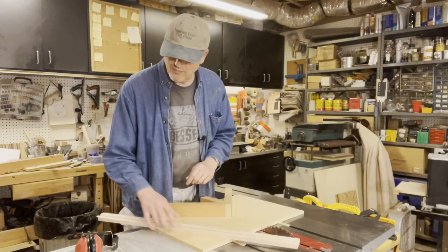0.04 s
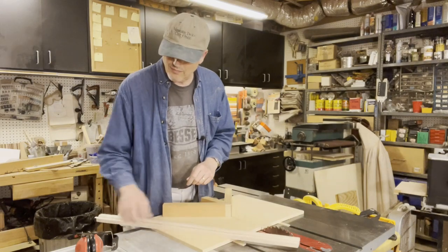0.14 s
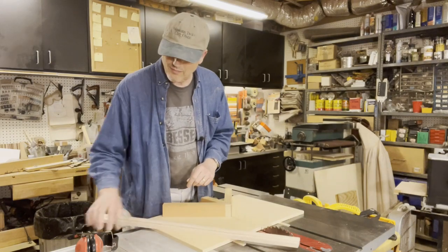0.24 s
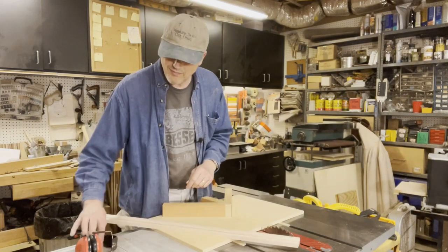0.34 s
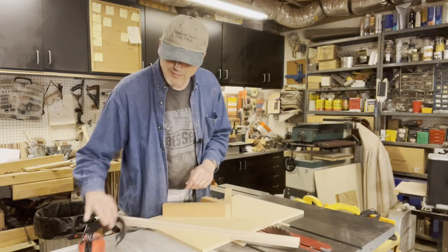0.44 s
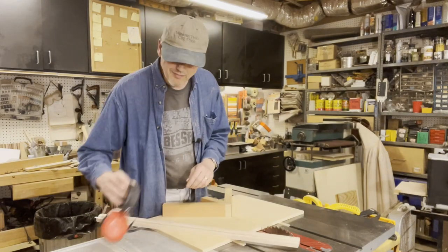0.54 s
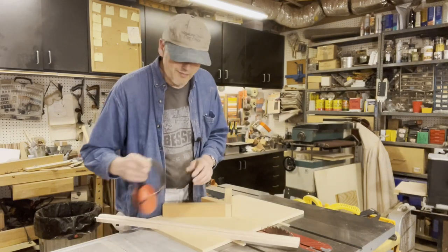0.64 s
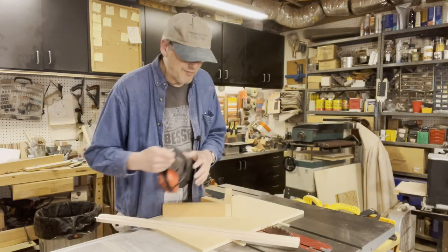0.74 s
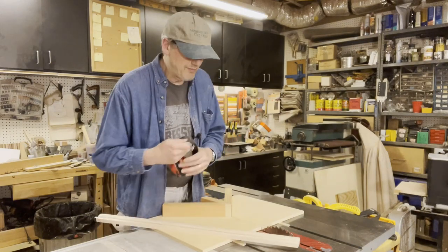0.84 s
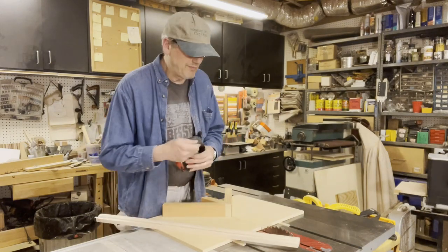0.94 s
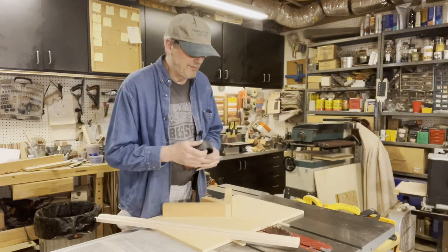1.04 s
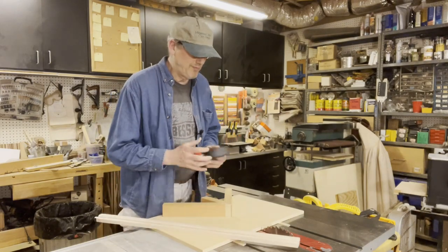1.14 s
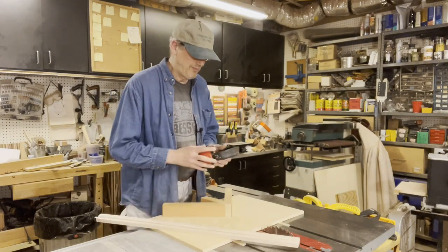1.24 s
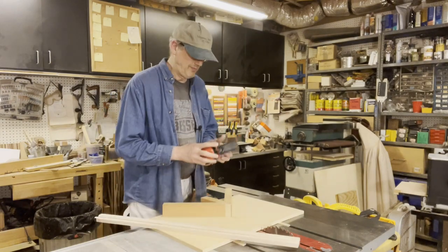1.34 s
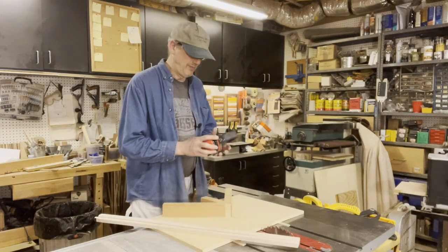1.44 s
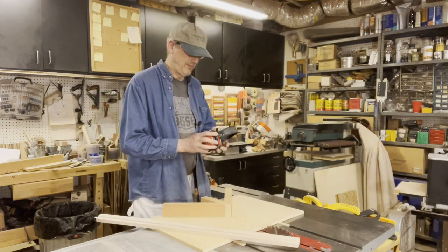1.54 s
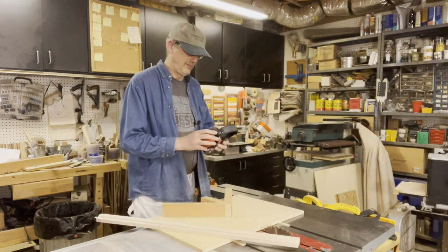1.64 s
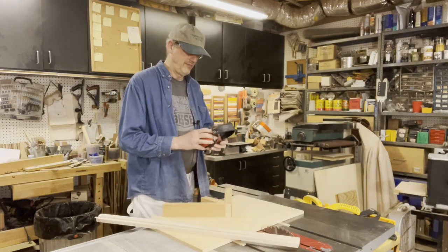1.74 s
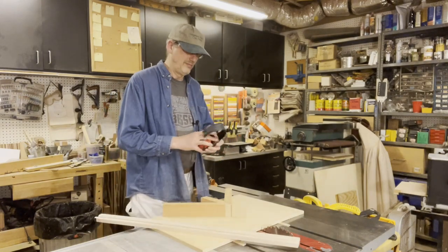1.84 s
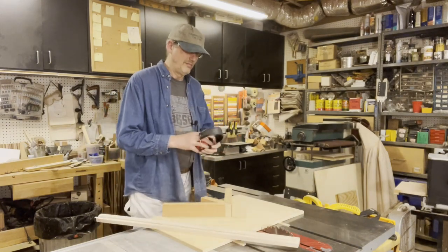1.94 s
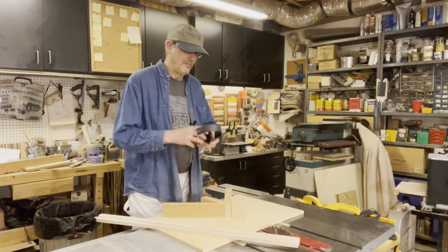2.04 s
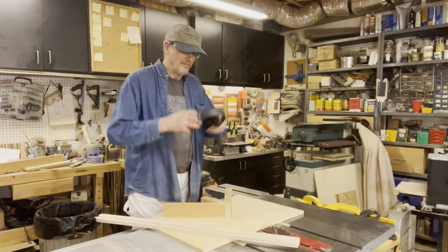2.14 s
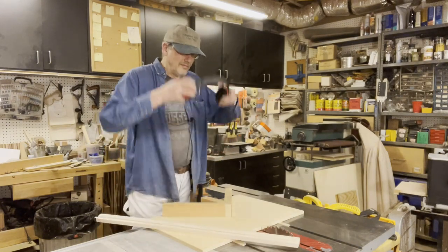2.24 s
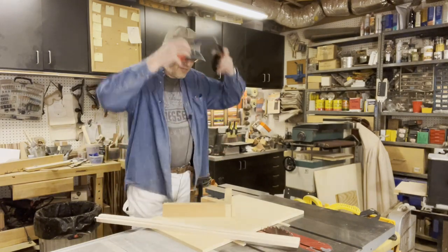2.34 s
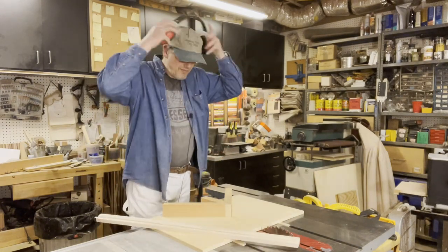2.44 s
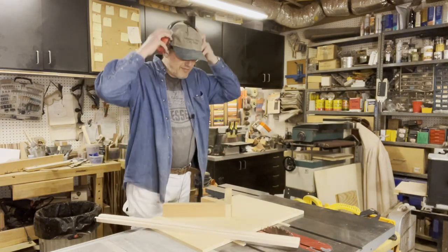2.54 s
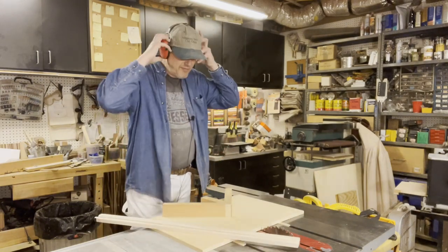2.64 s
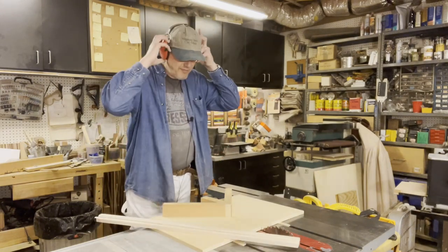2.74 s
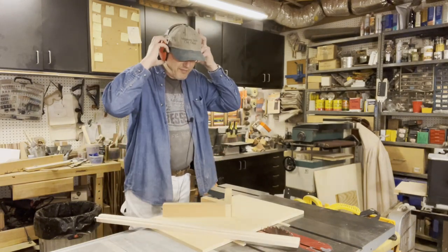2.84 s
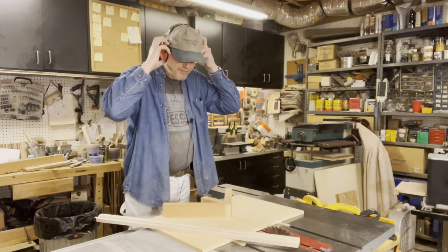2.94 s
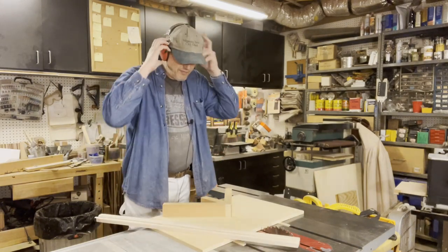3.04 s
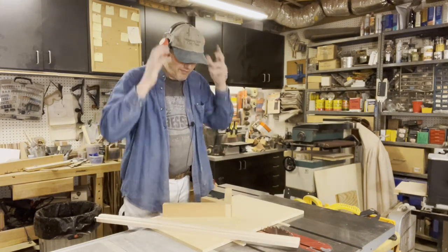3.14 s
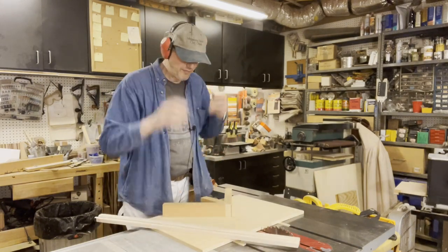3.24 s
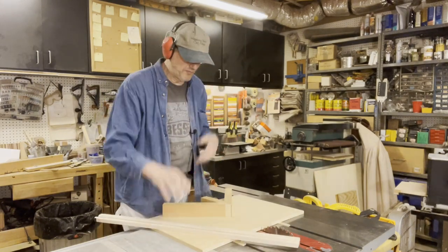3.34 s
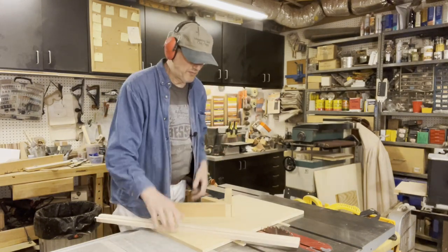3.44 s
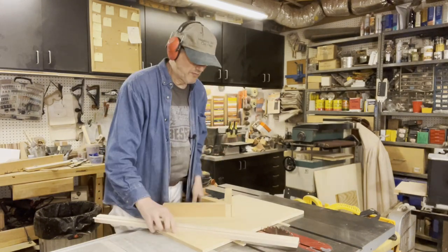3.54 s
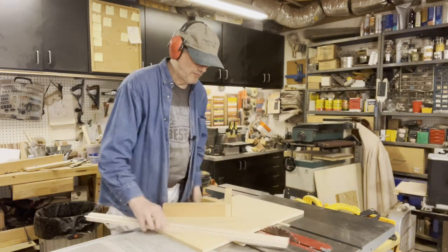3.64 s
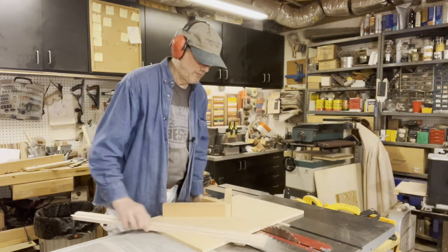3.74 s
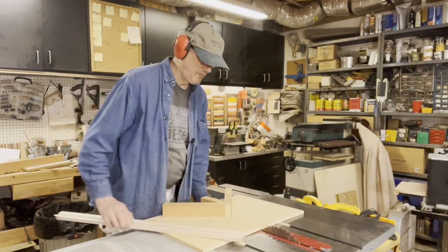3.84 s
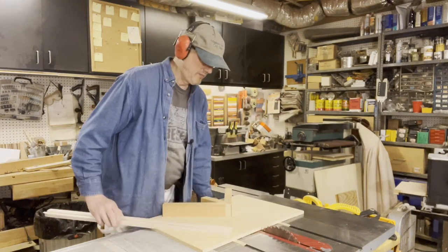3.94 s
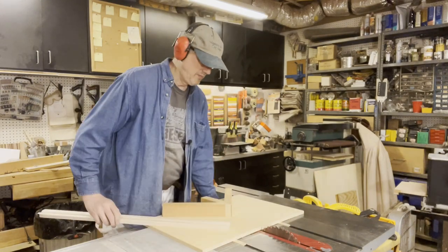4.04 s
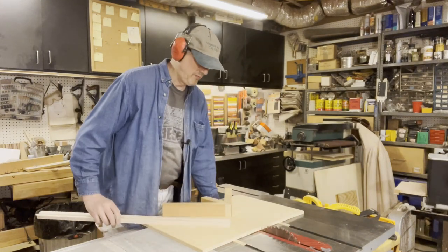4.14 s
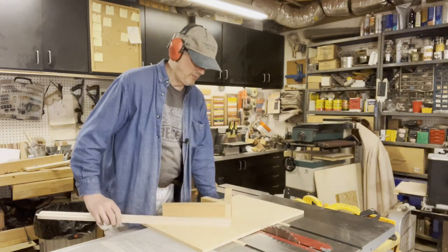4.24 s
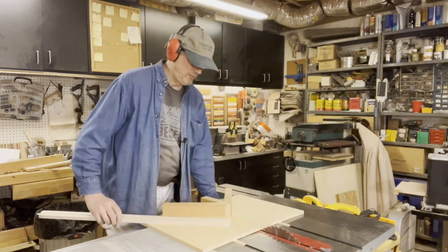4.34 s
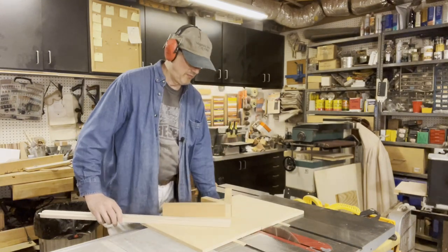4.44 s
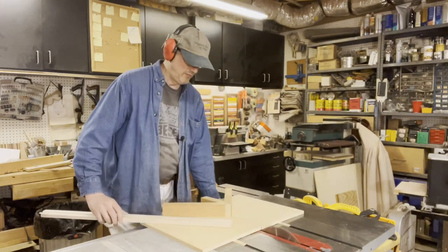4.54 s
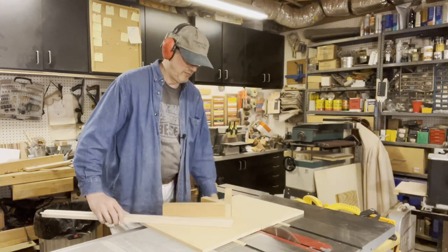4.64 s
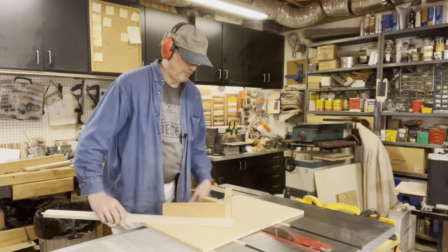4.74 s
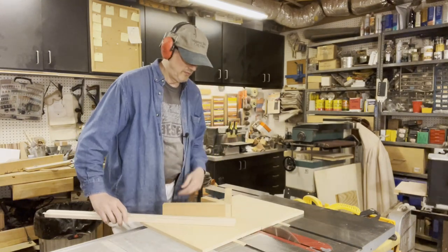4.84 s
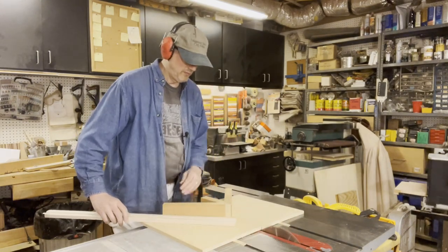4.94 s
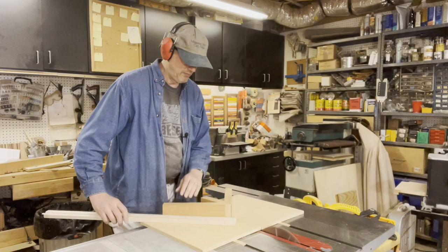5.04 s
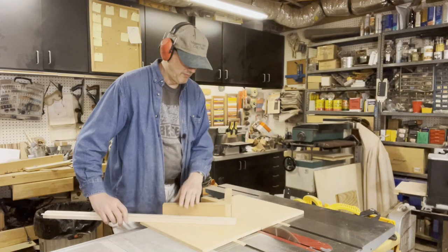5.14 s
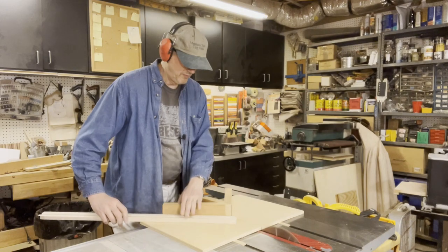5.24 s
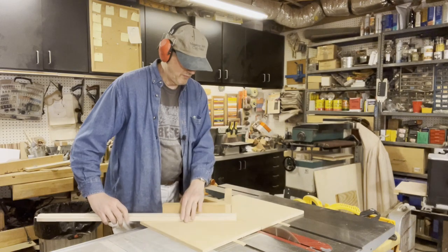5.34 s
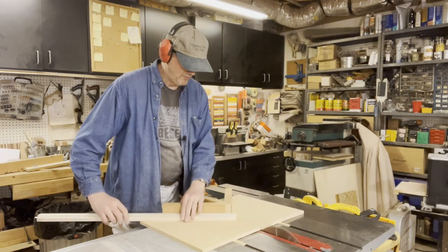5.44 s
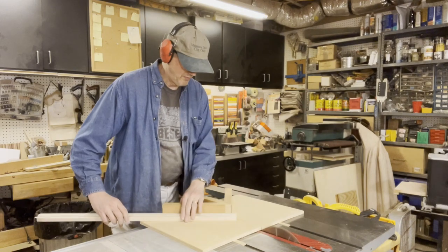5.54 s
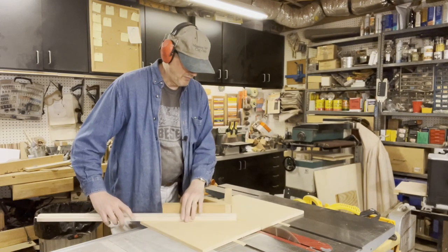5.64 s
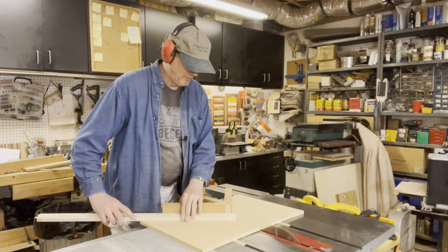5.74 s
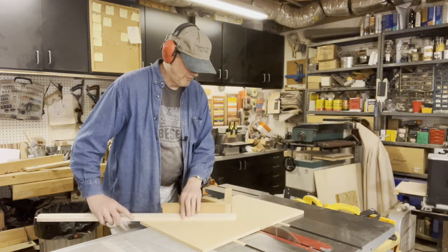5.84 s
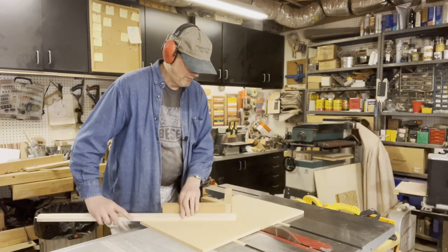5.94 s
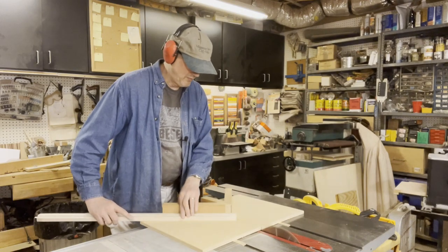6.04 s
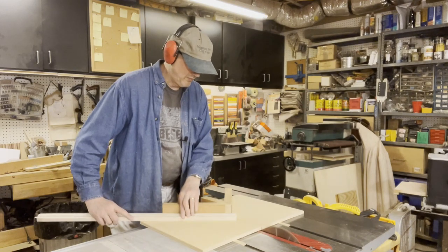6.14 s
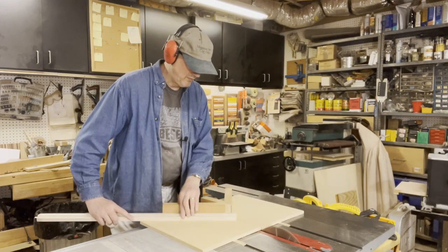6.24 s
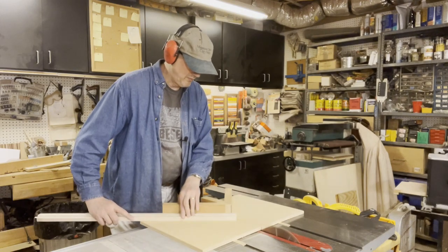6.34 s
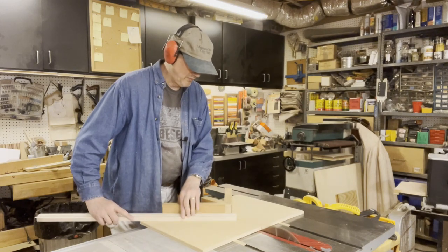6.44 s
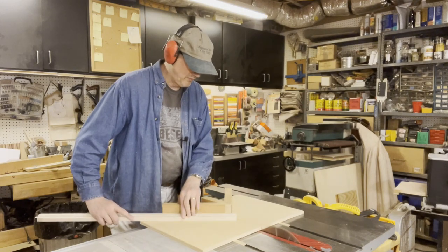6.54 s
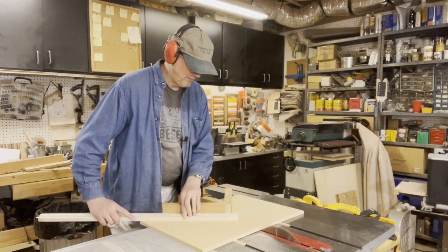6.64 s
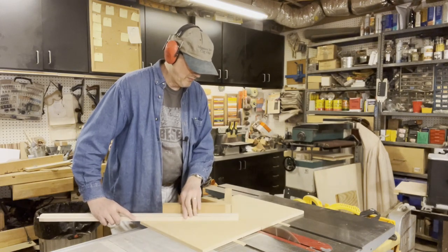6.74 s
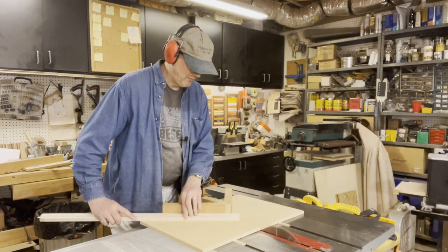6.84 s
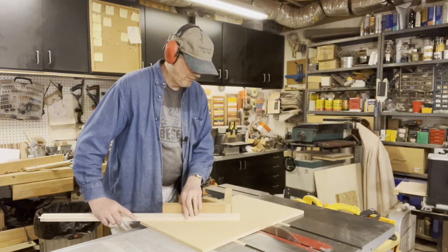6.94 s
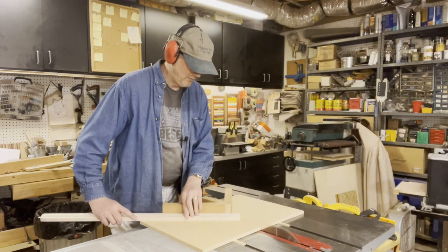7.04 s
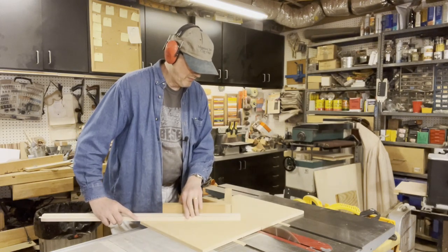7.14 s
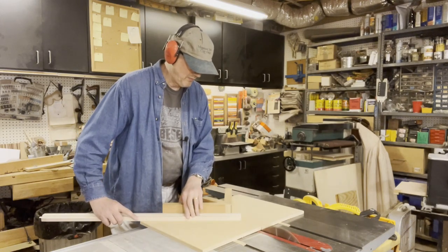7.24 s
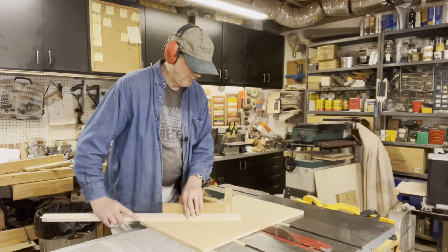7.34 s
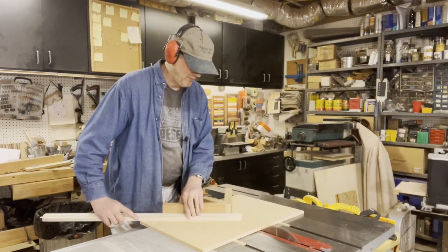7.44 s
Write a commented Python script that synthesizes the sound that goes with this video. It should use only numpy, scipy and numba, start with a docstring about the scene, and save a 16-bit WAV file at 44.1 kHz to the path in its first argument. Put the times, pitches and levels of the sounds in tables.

```python
"""A table saw starts up in a small crowded workshop: the motor jolts and hums, the blade runs up to a breathy
whistle. Hum is steady sines; roar, whistle and air are shaped noise, the whistle's pitch following the blade.
Before it, a wooden strip knocks and slides on a plywood sled (ringing modes, grainy rubbing), plastic ear
defenders click, sleeves rustle and panels thud. All is heard by a microphone pair, with a low house rumble
until the saw's roar covers it."""
import sys
import numpy as np
from scipy import signal
from scipy.fft import rfft, irfft
from scipy.io import wavfile
from scipy.ndimage import uniform_filter1d
from numba import njit

SR = 44100
rng = np.random.default_rng(int(sys.argv[2]) if len(sys.argv) > 2 else 0)


def to_wav(s):
    """Save 16-bit WAV."""
    ch = np.atleast_2d(s).T  # columns
    pcm = np.round(np.clip(ch, -1, 1) * 32767)  # PCM
    wavfile.write(sys.argv[1], SR, pcm.astype(np.int16))


N = 329427
T = np.arange(N) / SR
HUM_HZ = 120  # twice the mains frequency
JOLT_END_S = 4.681

# saw running up, surging as the starting switch lets go, then settling:
# [t/s, hum level/dB, cabinet roar level/dB, blade whistle level/dB]
SAW = [(4.681, -51, -38, -60), (4.711, -57, -32.5, -43), (4.779, -52, -39.5, -47), (4.839, -42, -42, -51),
       (4.957, -41, -42, -51.5), (5.069, -31.5, -34.5, -39.5), (5.165, -33.5, -33.5, -37.5),
       (5.22, -42, -43, -37.5), (5.4, -44, -38, -35.5), (5.72, -43, -42, -40)]
# blade running up: [t/s, share of full speed]
SPEED = [(4.68, .2), (4.9, .5), (5.05, .74), (5.12, .86), (5.18, .94), (5.26, 1.0)]
# stereo width of the saw: [f/Hz, side minus mid level/dB]
SAW_SIDE = [(60, -26.5), (110, -17), (200, -15), (380, -9.5), (700, -2), (1290, -5), (2380, -8),
            (4400, -3.5), (8120, -4.5), (15000, 3)]
# resonances of the rubbed ear-defender cups: [f/Hz, width/Hz, level/dB]
HOLLOW = [(860, 130, -0.5), (1790, 150, -12), (2220, 99, 0), (3770, 230, -28), (4300, 470, -15)]
# resonances of the rubbed strip: [f/Hz, width/Hz, level/dB]
STRIP = [(402, 57, 1.5), (669, 19.5, 4), (1246, 69, 5), (1640, 43, -2), (2280, 28, -22.5), (2726, 160, -4),
         (3500, 16, -10), (4000, 180, -17), (4720, 94, -6), (5900, 78, -25)]


def undb(db):
    """Decibels to an amplitude factor."""
    return 10 ** (np.asarray(db) / 20)


def unit(x):
    """The sound at rms 1."""
    return x / np.sqrt(np.mean(x ** 2))


def curves(table):
    """Columns of a table as sample-rate lines: -120 before the first time, the last value held after."""
    s, *columns = np.transpose(table)
    return [np.interp(T, s, c, left=-120, right=c[-1]) for c in columns]


def on_log(table, hz):
    """A table's values read off along a logarithmic frequency axis."""
    f, v = np.transpose(table)
    return np.interp(np.log(hz + 1), np.log(f + 1), v)


@njit
def svf(x, hz, width):
    """State-variable band-pass whose centre and width may move, gain 1 at the centre."""
    y, b, l = np.empty(len(x)), 0., 0.
    for i in range(len(x)):
        g, k = np.tan(np.pi * hz[i] / SR), width[i] / hz[i]
        v = (b + g * (x[i] - l)) / (1 + g * (g + k))
        b, l, y[i] = 2 * v - b, l + 2 * g * v, k * v
    return y


def walk(rate):
    """Random levels held 1 / rate s and slewed twice; spread near 1."""
    k = int(SR / rate)
    steps = np.repeat(rng.standard_normal(N // k + 1), k)
    return 1.8 * uniform_filter1d(uniform_filter1d(steps, k), k)[:N]


def grit(shape, spread_db):
    """Dense noise grains of randomly uneven size."""
    size_db = spread_db * np.minimum(rng.exponential(size=shape), 4)
    return rng.standard_normal(shape) * undb(size_db)


def spread(mid, side, table):
    """Left and right from a mid sound and an unrelated side sound weighted by frequency."""
    side_gain = undb(on_log(table, np.fft.rfftfreq(N, 1 / SR)))
    side = irfft(rfft(side) * side_gain, N)
    return np.array([mid + side, mid - side])


def noise(colour, side_table, grit_db=0.):
    """Stereo coloured noise, mid rms 1; grit makes it a rain of uneven grains."""
    gain = undb(on_log(colour, np.fft.rfftfreq(N, 1 / SR)))
    mid, side = (unit(irfft(rfft(grit(N, grit_db)) * gain, N)) for _ in range(2))
    return spread(mid, side, side_table)


def band(x, lo_hz, hi_hz, order):
    """A band-passed sound at peak 1."""
    y = signal.sosfilt(signal.butter(order, [lo_hz, hi_hz], "band", fs=SR, output="sos"), x)
    return y / np.abs(y).max()


def place(out, s, sound, pan_db):
    """Adds a sound to the microphone pair, left 3 samples later; pan_db is left minus right."""
    for channel, lag, db in ((0, 3, pan_db / 2), (1, 0, -pan_db / 2)):
        i = int(s * SR) + lag
        out[channel, i:i + len(sound)] += undb(db) * sound


def resonate(x, table, wander_db):
    """A body's resonances excited by rubbing; each swells and fades as the contact point moves."""
    out, still = 0, np.ones(len(x))
    for hz, width, db in table:
        level = undb(db + wander_db * walk(30)[:len(x)])
        out = out + level * svf(x, hz * still, width * still)
    return unit(out)


def rings(table, scale, blur):
    """Unrelated noise through each resonance, twice for steep skirts, evened out for bandwidth."""
    out = 0
    for hz, width, db in table:
        once = svf(rng.standard_normal(N), hz * scale, width * blur)
        twice = svf(once, hz * scale, width * blur)
        out = out + undb(db) * twice / np.sqrt(np.pi * width * blur / SR)
    return out


def blows(events, modes, octaves, rise, t60, pan_db, crack_s, crack_db):
    """Each blow rings the modes near its centre afresh, with a short rattling contact and a bright crack."""
    out, t = np.zeros((2, N)), np.arange(SR // 4) / SR
    hz, mode_db, mode_t60 = (c[:, None] for c in np.transpose(modes))
    # the blow's own damping shortens every mode
    decay = np.log(1000) * (1 / np.clip(mode_t60, .02, 1) + 1 / t60)
    onset = np.clip(t / rise, 0, 1)
    for s, peak_db, centre_hz, top_db in events:
        detune, size = rng.standard_normal((2, len(modes), 1))
        tones = np.sin(2 * np.pi * hz * (1 + 0.055 * detune) * t)
        ring = np.sum(undb(mode_db + 2 * size) * tones * np.exp(-decay * t), axis=0)
        contact = rng.standard_normal(len(t)) * np.exp(-t / crack_s)
        struck = onset * (ring / np.abs(ring).max() + undb(crack_db) * contact)
        body = band(struck, centre_hz / 2.8, centre_hz * 2 ** octaves, order=3)
        crack = band(onset * contact, 3300, 7000, order=3)
        place(out, s, undb(peak_db) * (body + undb(top_db) * crack), pan_db)
    return out


def strokes(table, body, ring_db):
    """Each stroke swells fast and fades; fibres catch as dense grains and ring the rubbed body."""
    out = np.zeros((2, N))
    for start, length, db, centre_hz, hiss_db in table:
        u = np.linspace(0, 1.6, int(1.3 * length * SR))
        shape = np.clip(u / 0.29, 0, 1) ** 2 * np.exp(-(u / 0.96) ** 4)
        grains = grit((3, len(u)), 3.1)
        # one part in the middle, one mostly in each capsule
        for k, pan_db in enumerate((0, -40, 40)):
            rub = unit(band(grains[k], centre_hz / 2.26, centre_hz * 2, order=1))
            hiss = unit(band(grains[k], 5900, 9200, order=2))
            ring = sum(undb(d) * signal.lfilter(*signal.iirpeak(hz, hz / w, SR), grains[k]) for hz, w, d in body)
            stroke = rub + undb(hiss_db) * hiss + undb(ring_db) * unit(ring)
            place(out, start, undb(db - 0.5 * abs(pan_db)) * shape * stroke, pan_db)
    return out


def room(dry):
    """Dense echoes off shelves and benches; the treble dies first, the bass is more alike left and right."""
    # octave bands of the echo: [f/Hz, t60/s, level/dB]
    octave_bands = [(293.7, 0.2, 4), (620, 0.16, 0.5), (1192, 0.16, 0), (2380, 0.17, 0.5), (4700, 0.18, 0),
                    (9600, 0.067, -6.5)]
    t = np.arange(SR // 2) / SR
    tail = 0
    for hz, t60, db in octave_bands:
        sos = signal.butter(2, [hz / np.sqrt(2), hz * np.sqrt(2)], "band", fs=SR, output="sos")
        shared = 1.62 * min(300 / hz, 2) * rng.standard_normal(len(t))
        echo = rng.standard_normal((2, len(t))) + shared
        tail = tail + undb(db) * signal.sosfilt(sos, echo) * np.exp(-np.log(1000) * t / t60)
    tail = tail * np.clip(t / 0.007, 0, 1)
    tail = tail / np.sqrt(np.sum(tail ** 2) / 2)
    return dry + undb(-5) * signal.fftconvolve(dry.mean(axis=0)[None], tail, axes=1)[:, :N]


def rumble():
    """House rumble: low noise of wavering level, left out once the saw's roar covers it."""
    # rumble level: [t/s, level/dB]
    rumble_level = [(0.0, -60), (0.38, -57), (0.63, -66), (1.02, -66.5), (2.2, -70), (2.85, -65.5),
                    (3.25, -71.5), (3.57, -63), (3.78, -66.5), (3.93, -63.5), (4.33, -61), (4.6, -74),
                    (4.7, -56), (4.75, -92)]
    # rumble spectrum: [f/Hz, level/dB per Hz]
    rumble_colour = [(15, -43.5), (25, -20), (37, -6), (49, 0), (65, 2), (87, -11.5), (124, -2), (162, -21),
                     (250, -14), (320, -36.5), (550, -120)]
    # rumble stereo width: [f/Hz, side minus mid level/dB]
    rumble_side = [(30, -11.5), (80, -10), (250, -7.5)]
    return undb(curves(rumble_level)[0] + 2.8 * walk(8)) * noise(rumble_colour, rumble_side)


def thuds():
    """Soft pushes into heavy panels: a low, quickly damped cluster of three tones."""
    # dull thuds through table top and floor: [t/s, peak level/dB, f/Hz, t60/s]
    pushes = [(0.022, -30.5, 389, .12), (0.046, -38, 133, 0.24), (0.181, -25, 262, 0.083),
              (0.19, -24.5, 140.7, 0.42), (0.252, -26.5, 167, .18), (0.28, -23, 408, 0.14),
              (0.305, -26.5, 123.4, .35), (0.537, -33.5, 157.5, .13), (0.594, -24, 405, 0.057),
              (0.605, -28, 180, .2), (0.652, -28, 414, 0.083), (1.027, -44, 167, 0.052),
              (1.047, -44.5, 106, 0.13), (1.159, -44.5, 113, .3), (1.518, -49, 137.4, 0.11),
              (1.907, -37.5, 214, 0.11), (2.771, -29.5, 175, 0.094), (3.676, -33, 334, 0.086),
              (3.719, -38, 122, .29), (3.999, -34, 375, 0.18), (4.15, -41, 520, .095),
              (4.424, -39.5, 71, 0.29), (4.453, -41.5, 74, 0.18), (4.5, -40.5, 75.7, 0.29),
              (4.549, -39, 72, 0.16), (5.141, -52, 119, .26)]
    out, t = np.zeros((2, N)), np.arange(SR // 2) / SR
    onset = 1 - np.exp(-t / 0.004)
    for s, peak_db, hz, t60 in pushes:
        ratio = np.array([[.75], [1.], [1.45]]) * (1 + .05 * rng.standard_normal((3, 1)))
        weight = np.array([[.5], [1.], [.6]])
        tones = np.sum(weight * np.sin(2 * np.pi * hz * ratio * t), axis=0)
        tones = tones * onset * np.exp(-np.log(1000) * t / t60)
        place(out, s, undb(peak_db) * band(tones, 0.63 * hz, 3.3 * hz, order=2), -1.1)
    return out


def hands():
    """Sleeves, hands and fingers rub the hollow cups and the stretched headband, each stroke a burst of grains."""
    # single strokes of sleeve or hand: [t/s, length/s, level/dB, centre f/Hz, hiss minus that level/dB]
    sleeve_strokes = [(0.021, 0.049, -50, 1500, -31), (1.013, 0.08, -63.5, 2210, -8.5),
                      (1.146, 0.1, -49.5, 1470, -26.5), (1.21, 0.088, -53, 2810, -23),
                      (1.346, 0.123, -74, 3550, 7), (1.566, 0.064, -67, 2610, -16),
                      (1.907, 0.043, -52, 2505, -5), (1.997, 0.073, -68, 2550, 2.5),
                      (2.7, 0.15, -55.5, 1300, -14), (2.765, 0.082, -53, 1810, -16),
                      (2.93, 0.17, -69, 1995, -7), (4.475, 0.12, -72.5, 548, -37)]
    # fingers rubbing the hollow cups: [t/s, length/s, level/dB, centre f/Hz, hiss minus that level/dB]
    finger_strokes = [(0.581, 0.11, -65.5, 2500, -22), (1.854, 0.042, -72, 1910, -19),
                      (2.159, 0.087, -55.5, 1470, 0.5), (2.245, 0.07, -68.5, 2000, 9)]
    # headband stretched over the cap: [t/s, length/s, level/dB, centre f/Hz, hiss minus that level/dB]
    stretches = [(2.40, 0.066, -75, 3000, 8), (2.465, 0.19, -75.5, 1800, -21), (2.57, 0.22, -72, 2500, -20),
                 (2.6, 0.06, -69.5, 1050, -22)]
    # headband resonances: [f/Hz, width/Hz, level/dB]
    headband = [(1030, 130, 2), (1243, 85, -5), (1970, 78, -7), (3080, 170, -4)]
    sleeves = strokes(sleeve_strokes, HOLLOW, ring_db=-23.0)
    fingers = strokes(finger_strokes, HOLLOW, ring_db=4.5)
    return sleeves + fingers + strokes(stretches, headband, ring_db=2.5)


def ear_defenders():
    """Plastic ear defenders handled and snapped on: short blows ringing the hollow cups."""
    # clicks: [t/s, peak level/dB, centre f/Hz, crack minus peak level/dB]
    clicks = [(1.869, -42, 1820, -20), (1.91, -29.5, 2380, 1), (2.2, -34, 1800, -25),
              (2.247, -34.5, 2330, 7), (2.771, -26.5, 800, -9)]
    # cup modes before the blow's damping: [f/Hz, level/dB, t60/s (held to 0.02-1)]
    cups = [(770, -10.5, 0.48), (1085, -31, 1.2), (1410, -37, 5.0), (1727, -4, 0.13), (2190, -27, 0.41),
            (2177, 2.5, 0.018), (2455, -17, 5.0), (2864, 1.5, 0.32), (3530, -14, 0.32), (3902, -20, 0.13),
            (4080, -4, 0.6), (4780, -18, 5.0), (4970, -18, 0.063), (5370, -37, 0.11)]
    return blows(clicks, cups, octaves=0.87, rise=0.00096, t60=0.032, pan_db=-5, crack_s=0.0021, crack_db=1)


def scuffs():
    """The strip's edge catches as it slides: brief grainy strokes that ring the strip."""
    # catches: [t/s, length/s, level/dB, centre f/Hz, hiss minus that level/dB]
    edge_catches = [(3.69, 0.07, -71, 1800, -21), (3.865, 0.056, -63, 1300, -27),
                    (3.94, 0.05, -54, 2800, -22), (4.17, 0.063, -67, 1600, -17),
                    (4.235, 0.045, -57, 2900, -19)]
    return strokes(edge_catches, STRIP, ring_db=4.5)


def rubbing():
    """Cloth and wood sliding over background hiss: catching grains, a dull drone of the sled and a fine hiss."""
    # rustle and background hiss, nearly silent just after the loud knock: [t/s, level/dB]
    rustle = [(0.0, -65), (0.15, -59.5), (0.21, -69), (0.35, -100), (0.5, -79), (0.57, -48.5),
              (0.63, -62.5), (0.78, -67.5), (0.98, -76), (1.24, -73), (1.57, -75.5), (2.1, -73),
              (2.24, -71), (2.39, -76), (2.67, -72), (2.85, -77.5), (3.0, -78.5), (3.22, -80.5),
              (3.67, -83.5)]
    # sled booms after the drop, then drones as things are dragged off it: [t/s, level/dB]
    drag = [(0.17, -93), (0.2, -39), (0.33, -40), (0.42, -54), (0.5, -71), (0.57, -45.5), (0.69, -37.5),
            (0.75, -58), (0.81, -87)]
    # strip slid into place in three pushes: [t/s, rub level/dB, drone level/dB]
    slide = [(3.67, -66, -73), (3.68, -64, -42), (3.728, -51, -54), (3.808, -56, -49.5), (3.97, -47.5, -82),
             (4.01, -44, -56), (4.062, -50, -60), (4.132, -54, -59), (4.15, -47.5, -54), (4.246, -44, -59),
             (4.294, -49.5, -50.5), (4.402, -68, -74), (4.456, -81, -66), (4.58, -93, -61), (4.6, -62, -72)]
    # spectrum of the fine hiss: [f/Hz, level/dB per Hz]
    rub_hiss = [(1470, -29.5), (2500, -5.5), (2850, -8.5), (3740, -8.5), (5740, -15.5), (8660, -10.5),
                (10900, -20), (12100, -33), (14700, -20.5), (16000, -34.5)]
    # spectrum of the rubbing grains: [f/Hz, level/dB per Hz]
    rub_body = [(290, -37.5), (500, 0.5), (553, -15.5), (659, -8), (943, -6), (1230, -8), (1450, -6),
                (2790, -11.5), (4500, -24.5), (5850, -50), (9900, -120)]
    # stereo width of the rubbing: [f/Hz, side minus mid level/dB]
    near_side = [(60, -4), (110, 6.5), (200, -11), (380, -2.5), (700, 3), (1290, -2.5), (2380, -2.5),
                 (4400, 4.5), (8120, -7), (15000, 4.5)]
    drone_colour = [(90, -28.5), (150, 8.5), (400, 6.5), (700, -10), (1100, -39.5)]  # f/Hz, level/dB per Hz

    rustle_db = curves(rustle)[0]
    slide_db, sled_db = curves(slide)
    sliding = T > slide[0][0]
    rub_db = np.where(sliding, slide_db, rustle_db - 4)
    drone_db = np.where(sliding, sled_db, np.maximum(rustle_db - 3.5, curves(drag)[0]))
    # hiss grows a little faster than the rub
    hiss_db = np.where(sliding, -57.5 + 1.13 * (slide_db + 51), rustle_db)

    strip = resonate(grit(N, 6.8), STRIP, wander_db=4.) * sliding
    grains = noise(rub_body, near_side, grit_db=4.0) + undb(-4.) * strip
    rub = undb(rub_db + 0.83 * walk(40)) * grains
    drone = undb(drone_db + 1.1 * walk(25)) * noise(drone_colour, near_side)
    hiss = undb(hiss_db + 0.78 * walk(27)) * noise(rub_hiss, near_side, grit_db=4.5)
    return (T < slide[-1][0]) * (rub + drone + hiss)


def wood_knocks():
    """Sled and strip knock together: each blow rings damped wooden modes."""
    # blows on sled and strip: [t/s, peak level/dB, centre f/Hz, crack minus peak level/dB]
    knocks = [(0.018, -17.5, 1480, -35), (0.059, -33, 630, 0), (0.182, -8.5, 1250, -29.5),
              (0.252, -26, 925, -18), (0.282, -7.5, 1480, -42), (0.289, -8, 1688, -29.5),
              (0.319, -22, 770, -39), (0.514, -45, 829, -6.5), (0.536, -34.5, 674, 3),
              (0.573, -22.5, 1490, -34), (0.651, -27, 610, -10.5), (3.479, -51.5, 774, -34),
              (3.677, -33.5, 1350, -13), (3.694, -33, 1290, -20), (3.877, -34, 1400, -13),
              (4.01, -32.5, 1300, -11), (4.152, -27, 680, -11), (5.547, -14, 1500, -10)]
    # wood modes before the blow's damping: [f/Hz, level/dB, t60/s (held to 0.02-1)]
    wood = [(544.4, -13.5, 0.12), (696.7, -3, 0.013), (790, -28.5, 0.062), (876, -6.5, 0.026),
            (940, -27, 2.2), (1165, -18, 0.25), (1267, -12, 0.078), (1360, -20.5, 0.14), (1470, -17, 0.24),
            (1553, -22, 0.39), (1797, -9.5, 0.12), (2150, -34.5, 0.087), (2000, -30.5, 0.062),
            (2420, -48.5, 5.0), (2350, -17, 0.36), (2540, -32.5, 0.11), (2430, -22.5, 0.15),
            (2850, -14.5, 0.095), (2920, -40.5, 0.24), (3060, -44.5, 5.0), (3480, -31, 0.25),
            (3320, -29, 0.4), (3919, -39, 0.11), (4791, -58, 0.13)]
    return blows(knocks, wood, octaves=0.75, rise=0.002, t60=0.04, pan_db=-2.5, crack_s=0.0044, crack_db=3.5)


def starting_switch():
    """The motor's starting switch lets go and settles: two blows on a ringing plate."""
    # switch blows: [t/s, peak level/dB, centre f/Hz, crack minus peak level/dB]
    switch_blows = [(5.074, -20.5, 1360, -21), (5.154, -27.5, 1030, -9)]
    # plate modes before the blow's damping: [f/Hz, level/dB, t60/s (held to 0.02-1)]
    plate = [(814, -7, 0.3), (1025, -6.5, 0.3), (1700, -16, 0.13), (2200, -8, 0.025)]
    return blows(switch_blows, plate, octaves=0.46, rise=0.0011, t60=0.11, pan_db=-2, crack_s=0.0038, crack_db=7.5)


def spit():
    """A short, very bright hiss swells and dies as the starting switch opens."""
    # spit spectrum: [f/Hz, level/dB per Hz]
    spit_colour = [(3000, -20), (6000, -6), (9000, 3), (11500, -8), (14000, -6), (16000, -14)]
    peak_s, rise_s, fall_s = 5.071, 0.0068, 0.018
    since = T - peak_s
    swell = np.exp(np.minimum(since / rise_s, -since / fall_s))
    return undb(-35.5) * swell * noise(spit_colour, SAW_SIDE, grit_db=2.5)


def throb():
    """At speed the cabinet throbs, for a while more strongly, over a faint low pair of tones."""
    # steady pair under the hum: [f/Hz, level/dB]
    low_tones = [(53.8, -64), (70.0, -65)]
    throb_hz, peak_s, swell_s, swell_width_s = 8.1, 6.1, 6.27, 0.39
    beat = 1 + np.cos(2 * np.pi * throb_hz * (T - peak_s) + 0.3 * walk(3.1))
    swell_db = 9.5 * np.exp(-((T - swell_s) / swell_width_s) ** 4)
    db = -56 + swell_db + 1.8 * walk(4.04)
    pair = sum(np.sqrt(2) * undb(d) * np.sin(2 * np.pi * hz * T) for hz, d in low_tones)
    # just under the second hum tone
    tone = undb(db) * beat * np.sin(2 * np.pi * (2 * HUM_HZ - throb_hz) * T)
    return np.interp(T, *np.transpose(SPEED)) ** 20 * (tone + pair)


def start_buzz():
    """While the start winding pulls, the hum buzzes with many uneven overtones."""
    end_s, fade_s, tilt_db = 5.17, 0.036, -5.5  # tilt per octave
    fade_out = np.clip((end_s - T) / fade_s + 1, 0, 1)
    fade_in = np.clip((T - JOLT_END_S) / 0.096, 0, 1)
    tones = 0
    for k in range(2, 14):
        level = undb(tilt_db * np.log2(k / 4) + 3.6 * walk(45))
        tones = tones + level * np.sin(2 * np.pi * k * HUM_HZ * T + k * k)
    roar_db = curves(SAW)[1]
    return undb(roar_db - 12.5) * fade_out * fade_in * tones


def jolt():
    """The starting jolt bursts in and swells while the motor strains; then the level drops abruptly."""
    # jolt spectrum: [f/Hz, level/dB per Hz]
    jolt_colour = [(18, -52.5), (30, -29), (221, -0.5), (404, -4.5), (461, -2), (962, -10), (1070, -21),
                   (1190, -14.5), (2120, -14.5), (2410, -20.5), (2980, -20), (8520, -35.5), (16000, -49)]
    start_s, lead_db_per_s, swell_db_per_s = 4.6208, 2100., 83
    since = T - start_s
    kick = np.cos(np.pi * HUM_HZ * T)  # once a mains cycle
    db = -25.5 + np.minimum(lead_db_per_s * since, swell_db_per_s * since) + 1.5 * kick
    return (T < JOLT_END_S) * undb(np.maximum(db, -150)) * noise(jolt_colour, SAW_SIDE, grit_db=-4.5)


def saw():
    """Magnetic hum, cabinet roar, air shed by the teeth (pitch follows blade speed) and broad air hiss."""
    # hum overtones: [multiple of the hum, level against the hum/dB]
    overtones = [(2, -22), (3, -20.5), (4, -20), (5, -16), (6, -18)]
    # roar spectrum: [f/Hz, level/dB per Hz]
    roar_colour = [(21, -54), (35, -27), (86, -21.5), (102, -10.5), (118, -4), (187, -12.5), (225, -8.5),
                   (306, -12.5), (474, -14.5), (552, -16.5), (612, -9.5), (1110, -19.5), (2000, -21),
                   (2600, -44), (4400, -120)]
    # cabinet resonances: [f/Hz, width/Hz, level/dB]
    cabinet = [(61.6, 30, -30), (160.5, 9.4, -9), (228.2, 23.46, -6), (359, 72, -8.5), (486, 27, -10),
               (799.4, 43, -13), (1472, 140, -13)]
    # blade whistle at full speed: [f/Hz, width/Hz, level/dB]
    whistle = [(2450, 405, 10), (2424, 28, -3.5), (2278, 100, -4), (2600, 320, -10), (2885, 300, 0),
               (3050, 620, -16.5), (2080, 870, -8.5), (4020, 67, -25.5), (3900, 1800, -42)]
    # air hiss spectrum: [f/Hz, level/dB per Hz]
    air_colour = [(2120, -3.5), (3600, -0.5), (4200, -3.5), (5300, -14), (6390, -15.5), (7150, -14),
                  (9240, -14.5), (11000, -20.5), (12000, -41), (13600, -20), (15000, -31.5), (16000, -15)]
    # air hiss, its last level held once at speed: [t/s, level/dB]
    air_level = [(4.681, -54), (4.763, -51), (4.83, -74), (4.903, -66), (5.047, -51), (5.075, -42),
                 (5.14, -45), (5.201, -47.5)]

    hum_db, roar_db, whistle_db = curves(SAW)
    speed = np.interp(T, *np.transpose(SPEED))
    phase = 2 * np.pi * HUM_HZ * T
    tones = np.sin(phase) + sum(undb(db + 2.7 * walk(10)) * np.sin(k * phase + k * k) for k, db in overtones)
    hum = np.sqrt(2) * undb(hum_db + 0.7 * walk(9.8)) * tones

    still = np.ones(N)
    panels = spread(rings(cabinet, still, still), rings(cabinet, still, still), SAW_SIDE)
    wind = noise(roar_colour, SAW_SIDE)
    # the motor fan's upper roar only builds with speed
    low = signal.sosfilt(signal.butter(1, 1100, fs=SR, output="sos"), wind)
    wind = low + speed ** 1.2 * (wind - low)
    roar = undb(roar_db + 1.06 * walk(30)) * (undb(-2.5) * wind + panels)

    # thin tone under the whistle, its pitch wavering about 2083 Hz
    whine_phase = 2 * np.pi * np.cumsum(2083 + 1.06 * walk(5.3)) / SR
    whine = undb(-9.5) * np.sin(whine_phase) * speed ** 10.0
    # below full speed the whistle is lower and far breathier
    blur = 1 + 5. * (1 - speed)
    mid, side = (unit(rings(whistle, speed, blur)) for _ in range(2))
    teeth = undb(whistle_db + 0.75 * walk(60)) * spread(mid + whine, side, SAW_SIDE)
    air = undb(curves(air_level)[0] + .5 * walk(29)) * noise(air_colour, SAW_SIDE)
    return hum + roar + teeth + air


def scene():
    """Sums the workshop; only the knocks, clicks and switch are sent through the room echo."""
    hits = room(wood_knocks() + ear_defenders() + starting_switch())
    pan_db = -0.5  # left minus right
    machine = (saw() + jolt() + start_buzz() + throb() + spit()) * undb([[pan_db / 2], [-pan_db / 2]])
    return rumble() + thuds() + hands() + scuffs() + rubbing() + hits + machine


def record(dry):
    """The recorder cuts the deep bass and the top."""
    thin = signal.sosfilt(signal.butter(3, 43, "high", fs=SR, output="sos"), dry)
    return signal.sosfilt(signal.ellip(8, .2, 80, 15900, fs=SR, output="sos"), thin)


dry = scene()
out = record(dry)
to_wav(out)
```